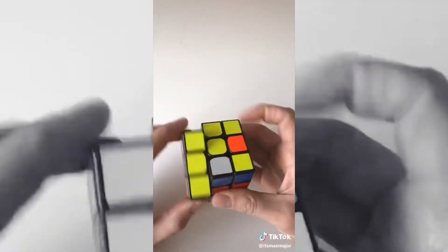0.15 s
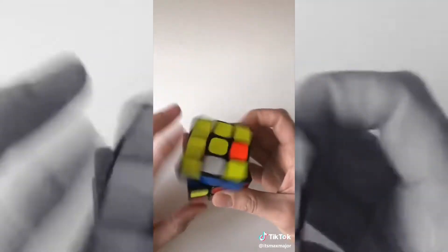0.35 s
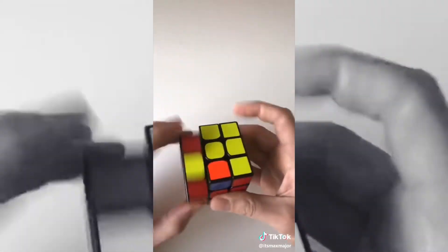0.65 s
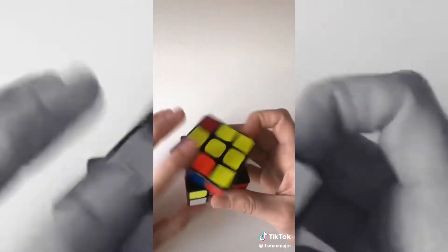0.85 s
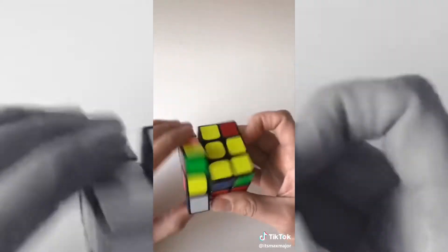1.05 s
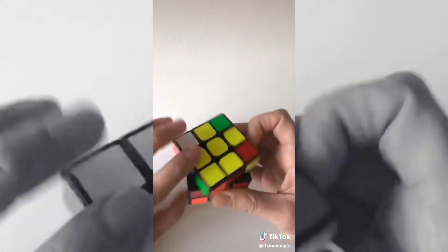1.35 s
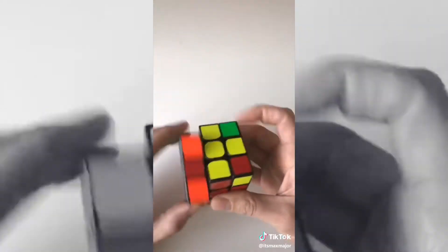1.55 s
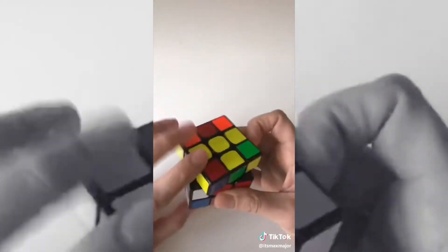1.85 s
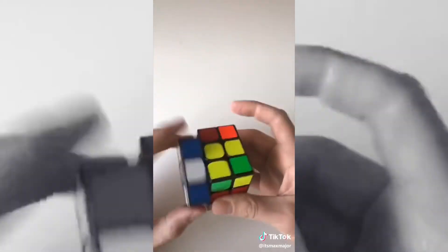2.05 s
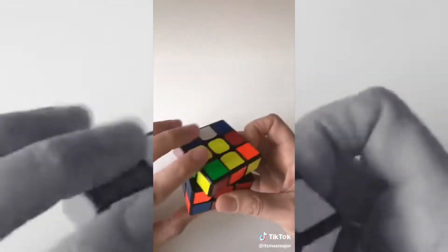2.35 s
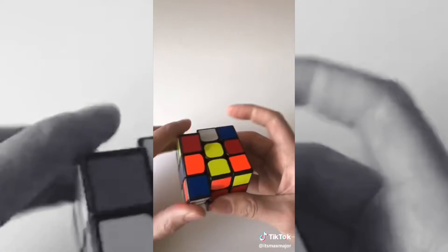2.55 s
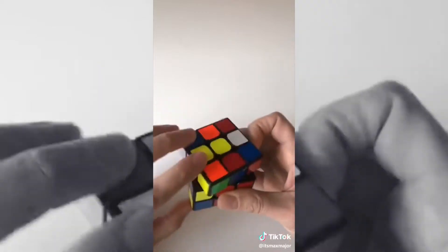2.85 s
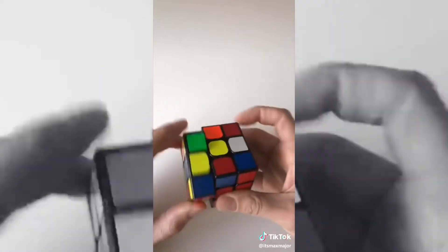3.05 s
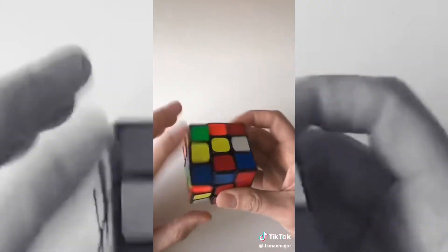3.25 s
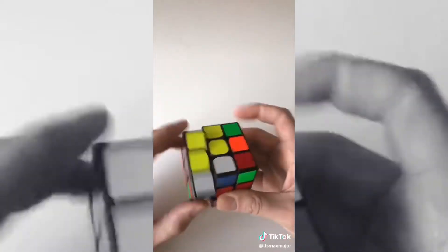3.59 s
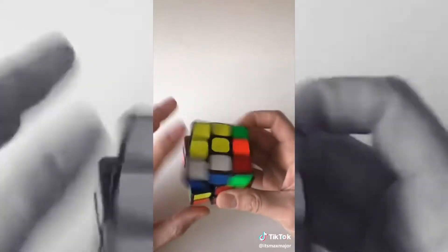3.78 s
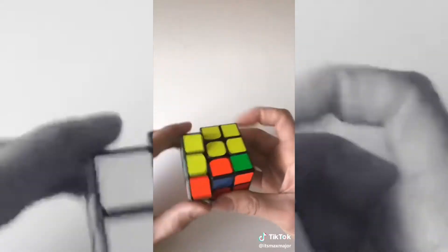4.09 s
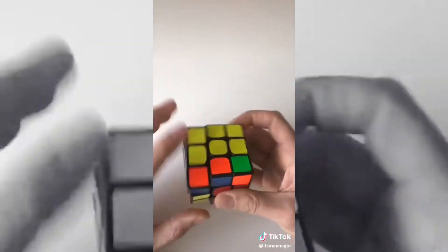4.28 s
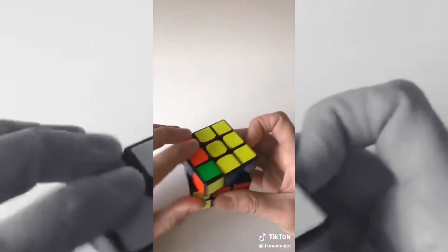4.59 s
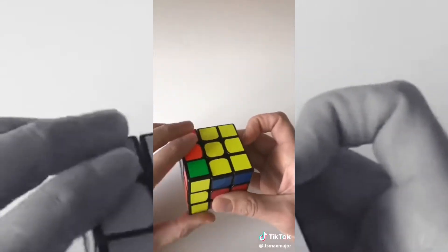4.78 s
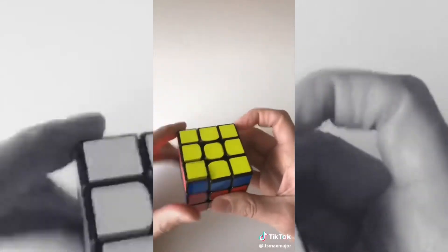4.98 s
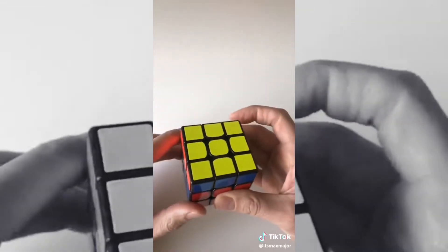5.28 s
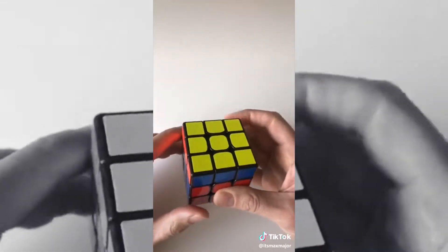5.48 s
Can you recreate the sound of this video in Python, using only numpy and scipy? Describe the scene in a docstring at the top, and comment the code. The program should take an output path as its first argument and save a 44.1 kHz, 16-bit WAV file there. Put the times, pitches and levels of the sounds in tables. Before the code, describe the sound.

A plastic puzzle cube is turned quickly by hand, close to the microphone in a small quiet room. Each turn is a brief dry scrape with a cluster of light, hollow clicks, about four turns a second, and five of them snap home much harder. Fingers rub faintly over the faces in between. Near the end the pace slackens to two last, separated turns. Soft room tone and a faint low hum lie underneath.

```python
"""A plastic puzzle cube is turned quickly by hand, close to the microphone in a small quiet room.
In each turn a layer scrapes round, its pieces knock against their neighbours and it clacks into line;
five turns snap home hard, and the pace slackens at the end. Scrapes and knocks are showers of tiny
impacts ringing the hollow body, the shells and the edges. Fingers rub and glide over the faces,
with soft room tone and a low hum underneath."""
import sys
import numpy as np
from scipy import signal
from scipy.fft import rfft, irfft
from scipy.io import wavfile

SR = 44100
rng = np.random.default_rng(int(sys.argv[2]) if len(sys.argv) > 2 else 0)


def unload_wav(signal):
    """Save mono or channel-first audio to the path in sys.argv[1] as 16-bit WAV at rate SR, clipped to [-1, 1]."""
    wavfile.write(
        sys.argv[1],
        SR,
        np.round(np.clip(np.atleast_2d(signal).T, -1, 1) * 32767).astype(np.int16),
    )


N = 248283
TIME = np.arange(N) / SR


def from_db(db):
    """Gain of a level in dB."""
    return 10 ** (np.asarray(db) / 20)


def rms_one(x):
    """Scale to rms 1."""
    return x / np.sqrt(np.mean(x ** 2) + 1e-20)


def resonate(x, hz, width_hz):
    """Two-pole resonance with gain 1 at its peak."""
    r = np.exp(-np.pi * width_hz / SR)
    poles = [1, -2 * r * np.cos(2 * np.pi * hz / SR), r * r]
    return signal.lfilter(np.array([1, 0, -1]) * (1 - r * r) / 2, poles, x + 1e-18)


def ring(x, hz, width_hz):
    """The same resonance twice over for steeper skirts, at rms 1."""
    return rms_one(resonate(resonate(x, hz, width_hz), hz, width_hz))


def butter(x, hz, kind, order=2):
    """Gentle Butterworth filter."""
    return signal.sosfilt(signal.butter(order, hz, kind, fs=SR, output="sos"), x)


def swells(rows):
    """Gain curve of bell-shaped swells. Each row: centre and half length in seconds, peak in dB."""
    return sum(from_db(db) * np.exp(-((TIME - s) / half_s) ** 2) for s, half_s, db in rows)


def impacts(size, per_s, spread_db):
    """Tiny impacts at random moments, of uneven strength and either sign."""
    hits = rng.random(size) < per_s / SR
    return hits * from_db(spread_db * rng.standard_normal(size)) * rng.choice([-1, 1], size)


# The plastic's resonances. Each row: pitch in Hz, width in Hz, level in dB within its register.
CUBE_MODES = [(600, 690, -8.5), (935, 420, -14.5), (1280, 210, -6), (1556, 470, 0.5), (2063, 520, -0.5),
              (2510, 720, 0.5), (3656, 920, -3), (4073, 240, -7.5), (4515, 370, -1.5), (5200, 590, -0.5),
              (5877, 640, 3.5), (6660, 860, 4.5), (7640, 840, -3), (8460, 550, 0.5), (9180, 1400, -0.5),
              (11630, 2100, -1), (13000, 720, -7)]


def cube(force, body_db, edge_db, detune=0.021, uneven_db=2.0, body_top_hz=4400, shell_top_hz=7300):
    """Hollow body, shells and edges ring as three registers; each piece is tuned a little differently."""
    registers = np.zeros((3, len(force)))
    for hz, width_hz, db in CUBE_MODES:
        own_hz = hz * np.exp(detune * rng.standard_normal())
        drive = force * np.sign(rng.random(len(force)) - .5)   # each hit lands elsewhere on the mode
        gain = from_db(db + uneven_db * rng.standard_normal())
        register = np.searchsorted([body_top_hz, shell_top_hz], hz)
        registers[register] += gain * ring(drive, own_hz, width_hz)
    body, shells, edges = map(rms_one, registers)
    return from_db(body_db) * body + shells + from_db(edge_db) * edges


# The turns. Each row: start and end in seconds, friction level in dB, level of the regrip after it in dB.
LAYER_TURNS = [(0, 0.033, -64, -83), (0.239, .29, -45.5, -73), (0.478, 0.588, -59, -81.5),
               (0.701, 0.778, -63.5, -70.5), (0.901, 1.023, -58.5, -88), (1.15, 1.219, -56.5, -72.5),
               (1.37, 1.487, -56.5, -89), (1.623, 1.702, -58.5, -78), (1.876, 1.962, -50.5, -71),
               (2.133, 2.186, -54, -75), (2.344, 2.444, -57.5, -77), (2.614, 2.683, -45, -70),
               (2.853, 2.94, -54, -87.5), (3.165, 3.218, -50.5, -75.5), (3.391, 3.496, -56.5, -92),
               (3.678, 3.742, -48.5, -72), (3.882, 3.968, -54.5, -85), (4.205, 4.275, -49, -67.5),
               (4.742, 4.894, -61.5, -79.5), (5.413, 5.483, -54.5, -86)]


def sliding(speed_up_s=0.03, stop_s=.012, catch_db=5.0, catch_s=0.0034):
    """Plastic faces catch and slip on each other while a layer gathers speed and stops."""
    out = np.zeros(N)
    knots = np.arange(0, N / SR, catch_s)
    catching = from_db(np.interp(TIME, knots, catch_db * rng.standard_normal(N)[:len(knots)]))
    for start, end, db, _ in LAYER_TURNS:
        during = (TIME > start) & (TIME < end)
        t = TIME[during]
        speed = np.minimum((t - start) / speed_up_s, (end - t) / stop_s).clip(max=1)
        grit = impacts(len(t), per_s=5100, spread_db=6.0)
        scrape = cube(grit, body_db=1.0, edge_db=-4.5)
        out[during] += from_db(db) * speed * catching[during] * scrape
    return out


def cavity(x, hz=1460, width_hz=70, db=-5):
    """The air inside the hollow pieces rings on briefly after each contact."""
    return from_db(db) * resonate(resonate(x, hz, width_hz), hz, 2 * width_hz)


# The reverb tail. Each row: frequency in Hz, energy in dB against the dry sound, seconds to fall 60 dB.
ROOM_TAIL = [(309.7, -12, .4), (700, -15, 0.5), (1460, -15.5, 0.26), (2980, -22.5, 0.43),
             (5800, -21.5, 0.23), (12000, -26, 0.28)]


def room(x, echo_s=0.0083, echo_db=-20, scatter_s=0.0017, first_wall_s=0.017):
    """Diffuse sound by half octave: a scattered echo off the nearest surface, then a short tail."""
    block = 16   # samples per envelope step
    t = np.arange(0, SR // 3, block) / SR
    echo = np.exp(-np.abs(t - echo_s) / scatter_s) * (t > echo_s / 2)
    tail_hz, tail_db, tail_t60 = np.transpose(ROOM_TAIL)
    out, white = np.zeros(N), rng.standard_normal((2, N))
    edges_hz = np.geomspace(300, 13500, 12)
    for k, band_hz in enumerate(zip(edges_hz, edges_hz[1:])):
        log_centre = np.log(band_hz).mean()
        db = np.interp(log_centre, np.log(tail_hz), tail_db)
        t60 = np.interp(log_centre, np.log(tail_hz), tail_t60)
        tail = from_db(-60 * t / t60) ** 2 * (t > first_wall_s)
        response = from_db(echo_db) ** 2 * echo / echo.sum() + from_db(db) ** 2 * tail / tail.sum()
        power = np.add.reduceat(butter(x, band_hz, "band") ** 2, np.arange(0, N, block)) / block
        envelope = np.sqrt(np.maximum(signal.fftconvolve(power, response), 0))
        out += np.repeat(envelope, block)[:N] * rms_one(butter(white[k % 2], band_hz, "band"))
    return out


# The colour of the still air. Each row: frequency in Hz, relative noise density in dB.
AIR_COLOUR = [(15, -31), (25, 4), (130, -1.5), (203, -2.5), (333, -7.5), (390, -11.5), (469, -15.5),
              (791, -14.5), (950, -12.5), (1200, -17.5), (2140, -22), (7910, -30.5), (11100, -27),
              (13000, -42.5)]
# The room's low drone. Each row: pitch in Hz, width in Hz, level in dB.
DRONE_BANDS = [(58.4, 8.8, -76), (115.4, 5.9, -73.5)]


def room_tone(air_db=-65):
    """A steady bed of rumble and hiss with a faint drone."""
    colour_hz, colour_db = np.transpose(AIR_COLOUR)
    bins_hz = np.maximum(np.arange(N // 2 + 1) * SR / N, 1)
    colour = from_db(np.interp(np.log(bins_hz), np.log(colour_hz), colour_db))
    air = irfft(rfft(rng.standard_normal(N)) * colour, N)
    drone = sum(from_db(db) * rms_one(resonate(rng.standard_normal(N), hz, width_hz))
                for hz, width_hz, db in DRONE_BANDS)
    return from_db(air_db) * rms_one(air) + drone


# The hum's brief rises. Each row: centre in seconds, half length in seconds, peak in dB.
HUM_RISES = [(1.272, 0.019, -58), (1.362, 0.032, -59.5), (1.562, 0.029, -54.5), (1.645, 0.047, -61.5),
             (3.845, 0.012, -57)]


def hum(hz=189.8, waver=0.53, rest_db=-79.5):
    """A low tone, made to waver by narrow noise, swells now and then."""
    tone = np.sqrt(2) * np.sin(2 * np.pi * hz * TIME)
    flutter = rms_one(resonate(rng.standard_normal(N), hz, width_hz=42))
    return (from_db(rest_db) + swells(HUM_RISES)) * rms_one(tone + waver * flutter)


# A piece catches on its neighbour. Each row: time in seconds, rattle length in seconds,
# shell level in dB over 4 ms, then hollow body and edges in dB against the shell.
PIECE_CLACKS = [(.0077, .002, -48.5, -0.5, -12), (0.0748, 0.0044, -60, 9.5, -6.5),
                (0.192, .002, -46, -1, -7), (.243, .003, -41, 0, -8.5), (.468, .002, -61, 0, 15),
                (0.4899, .004, -60.5, 12, 3), (0.5022, .001, -43.5, -3.5, -12),
                (0.5282, .002, -49.5, 6.5, -7), (.5372, .003, -53.5, 7, -2),
                (0.7132, .007, -45.5, 7.5, 2.5), (0.7277, .0015, -44.5, 2, -10),
                (0.7677, .002, -61.5, 17.5, -7), (0.8644, 0.0015, -62.5, 7.5, 0),
                (.9079, .0026, -43.5, 2.5, -2), (.9632, .005, -47, 3.5, -7), (0.9766, .002, -44, -1, -10),
                (1.003, .002, -52.5, 2, -12), (1.1409, .0024, -55, 9, 4), (1.1643, .007, -50, 10, -1),
                (1.1957, .0015, -47.5, 0, -5), (1.336, .001, -66, 13, -6), (1.3841, .0064, -41, 4, 0),
                (1.4062, .003, -41.5, 0.5, -2.5), (1.4333, .001, -44, 6, 7), (1.444, .003, -53, 8.5, -4),
                (1.6079, .001, -47, 1.5, -9), (1.653, .0033, -40, 1, -4.5), (1.6779, .01, -47, 2.5, -7),
                (1.8392, .001, -52.5, -1.5, 9.5), (1.882, .007, -49, 11, 2), (1.9066, .003, -42, 5, -4),
                (1.9305, .004, -45, -1, -2), (1.9415, .003, -44, 6, -5), (2.1402, .0025, -53, 9.5, 3.5),
                (2.1696, .006, -54.5, 5, -16), (2.2284, 0.0023, -57.5, 2, -12),
                (2.268, .0027, -49, -2.5, -7), (2.353, .0026, -54.5, 7.5, 6.5),
                (2.3701, .005, -41.5, 1, -5), (2.3781, .005, -37, 3.5, -5), (2.393, .002, -43, 4, -2),
                (2.401, .003, -48, 6.5, 0), (2.6234, .0026, -44.5, 4, -4), (2.6385, .006, -39, -1, 2),
                (2.8632, .0013, -56, 9, -1), (2.9131, .002, -42.5, 4.5, 6.5), (2.926, .002, -46, 6, -2),
                (3.177, .003, -41.5, 0, -6.5), (3.1887, .0066, -40.5, 2.5, -5),
                (3.1996, .0015, -30.5, -9, 0), (3.3747, .002, -55, -2, 6.5),
                (3.4018, 0.0068, -49.5, 8.5, 3), (3.425, .007, -40.5, 4, -4), (3.4579, .002, -47, 7, 9.5),
                (3.4642, .002, -48, 10, -7), (3.4941, .003, -56, 5, -2), (3.688, 0.0033, -43, 1.5, -12),
                (3.703, .003, -40.5, -2, -4), (3.7113, .002, -41, -3, -2), (3.8252, .0015, -60, -5, 11),
                (3.89, .003, -50.5, 5.5, -3), (3.9185, .003, -42.5, 2, -11),
                (3.9521, .001, -29.5, -5, -1.5), (4.1539, .002, -48.5, -2.5, -2.5),
                (4.3725, .004, -60.5, 4, -2), (4.8106, .003, -48.5, -6, -6), (4.827, .006, -37, -2.5, -2),
                (4.8632, .008, -48, 4.5, -0.5), (5.416, .0023, -47, 2.5, -2.5),
                (5.4357, .0046, -48.5, 7, 1), (5.4603, .005, -44.5, 4.5, -1.5),
                (5.5175, .002, -63.5, 13, 2)]
# The weight of a knock. Each row: shell level in dB, low cut in Hz.
KNOCK_LOW_CUT = [(-41, 470), (-18.5, 260)]


def clacks(rise_share=0.27, settle_s=0.0011, lead_in_db=-23, chatter_db=-25, chatter_s=0.015):
    """Every knock: a faint lead-in swells into a short rattle and settles with faint chatter."""
    t = np.arange(-SR // 80, SR // 32) / SR
    level_scale = np.sqrt(.004 * SR / len(t))   # levels count a knock's energy as if packed into 4 ms
    out = np.zeros(N + 2 * len(t))
    touches = nudges() + landings()
    for s, length_s, shell_db, body_db, edge_db in snaps() + PIECE_CLACKS + touches:
        before = np.maximum(length_s * 0.31 - t, 0)
        after = np.maximum(t - length_s * 0.52, 0)
        meeting = np.exp(-before / (rise_share * length_s) - after / settle_s)
        lead_in = from_db(lead_in_db) * np.exp(-before / length_s) * (before > 0)
        settling = from_db(chatter_db) * np.exp(-after / chatter_s) * (after > 0)
        force = (meeting + lead_in + settling) * impacts(len(t), per_s=10000, spread_db=4.5)
        knock = level_scale * cube(force, body_db, edge_db)
        # a light touch shakes one piece; only a hard snap moves the whole cube
        low_cut_hz = np.interp(shell_db, *np.transpose(KNOCK_LOW_CUT))
        start = int((s + t[0]) * SR) + len(t)
        out[start:start + len(t)] += from_db(shell_db) * butter(knock, low_cut_hz, "high")
    return out[len(t):len(t) + N]


def light_touch(s, db, length_s=0.0022, body_db=8, edge_db=-3.5):
    """The clack row for one small, hollow tap."""
    return s, length_s, db, body_db, edge_db


def nudges(per_turn=2, usual_db=-58.5, usual_friction_db=-55.5, follow=.5, spread_db=2.0):
    """Clack rows for pieces nudging each other through a turn, louder as the layer binds."""
    rows = []
    for start, end, friction_db, _ in LAYER_TURNS:
        moments = start + (end - start) * (np.arange(per_turn) + rng.random(per_turn)) / per_turn
        binding_db = follow * (friction_db - usual_friction_db)
        levels_db = usual_db + binding_db + spread_db * rng.standard_normal(per_turn)
        rows += map(light_touch, moments, levels_db)
    return rows


def handling(tick_s=0.0044, rub_share=0.37, hold_db=-83, regrip_after_s=0.077, regrip_half_s=0.1):
    """Loose pieces tick over the soft rub of the fingers, most as they take a new grip after a turn."""
    jolts = np.abs(impacts(N, per_s=19, spread_db=7.5))
    ticks = signal.lfilter([1], [1, -np.exp(-1 / (tick_s * SR))], jolts + 1e-18)
    rub = cube(rng.standard_normal(SR), body_db=1.0, edge_db=-4.0)
    regrips = swells([(end + regrip_after_s, regrip_half_s, db) for _, end, _, db in LAYER_TURNS])
    return (from_db(hold_db) + regrips) * rms_one(ticks + rub_share) * np.resize(rub, N)


def landings(lead_s=.022, scatter_s=0.0082, db=-66.5):
    """Clack rows for a finger landing just before it pushes, on every turn but the first."""
    return [light_touch(start - lead_s + scatter_s * rng.standard_normal(), db)
            for start, *_ in LAYER_TURNS[1:]]


# The hard accents. Each row: time in seconds, rattle length in seconds, shell level in dB over 4 ms,
# edges in dB against the shell, rebound delay in seconds, rebound in dB against the snap.
LAYER_SNAPS = [(0.2654, 0.0017, -19, -3.5, 0.0039, -5.5), (2.6504, 0.0022, -25.5, -2.5, 0.0046, 0),
               (3.2017, 0.0024, -16.5, -6.5, 0.0066, -14.5), (3.723, 0.0031, -22, -5.5, .005, -22.5),
               (4.2424, .0046, -18, -5, .008, -15)]


def snaps(snap_body_db=-9, rebound_body_db=-1.5, rebound_length_s=.0065):
    """Clack rows for a layer snapping home, overshooting and rattling back with more hollow body."""
    rows = []
    for s, length_s, db, edge_db, delay_s, rebound_db in LAYER_SNAPS:
        rows += [(s, length_s, db, snap_body_db, edge_db),
                 (s + delay_s, rebound_length_s, db + rebound_db, rebound_body_db, edge_db)]
    return rows


# Fingertip glides. Each row: centre in seconds, half length in seconds, peak in dB.
FINGER_GLIDES = [(0.819, 0.012, -63), (1.27, 0.022, -76), (4.428, 0.02, -68), (4.96, 0.024, -70),
                 (5.071, 0.018, -68)]


def glides(hz=6250, width_hz=700):
    """Skin hisses thinly over a smooth face."""
    return swells(FINGER_GLIDES) * ring(rng.standard_normal(N), hz, width_hz)


# Shifts of the hands. Each row: centre in seconds, half length in seconds, peak in dB.
HAND_MOVES = [(5.02, 0.13, -65.5), (5.62, 0.11, -68)]


def hand_rumble(hz=52, width_hz=35, rest_db=-83):
    """The hands rumble as they shift, and very faintly at rest."""
    return (from_db(rest_db) + swells(HAND_MOVES)) * ring(rng.standard_normal(N), hz, width_hz)


def scene():
    """The cube and the hands up close, their reverb and the room's bed, in mono."""
    plastic = clacks() + sliding() + handling()
    direct = plastic + cavity(plastic) + glides() + hand_rumble()
    return (direct + room(direct) + room_tone() + hum())[None]


def record(dry, low_cut_hz=38, high_cut_hz=13150):
    """The microphone drops the deepest bass; the top is cut steeply."""
    thinned = butter(dry, low_cut_hz, "high", order=3)
    return signal.sosfilt(signal.ellip(10, .2, 70, high_cut_hz, fs=SR, output="sos"), thinned)


dry = scene()
out = record(dry)
unload_wav(out)
```